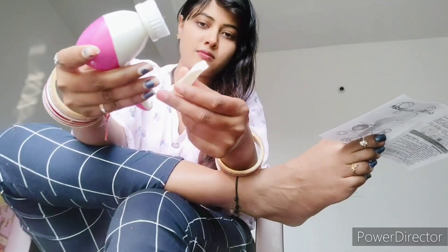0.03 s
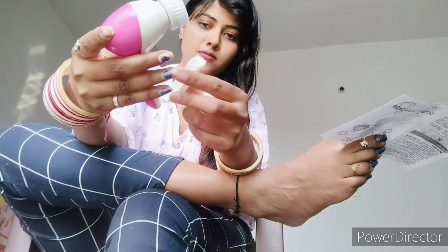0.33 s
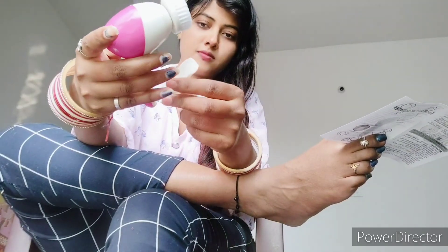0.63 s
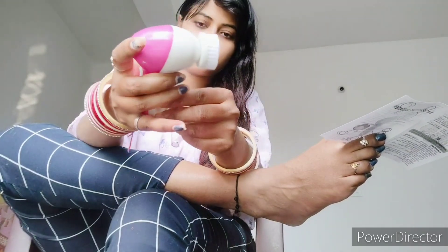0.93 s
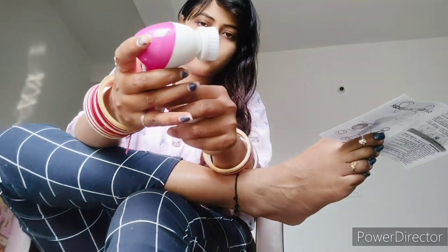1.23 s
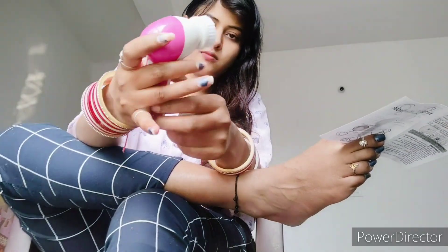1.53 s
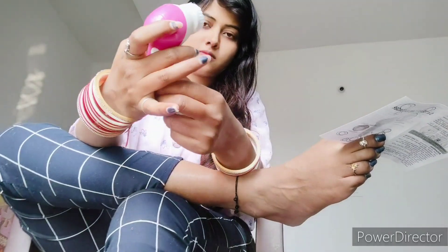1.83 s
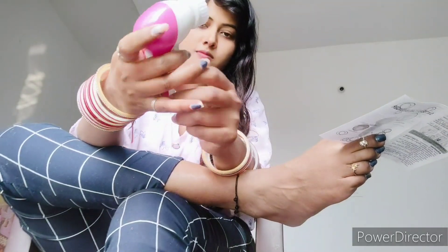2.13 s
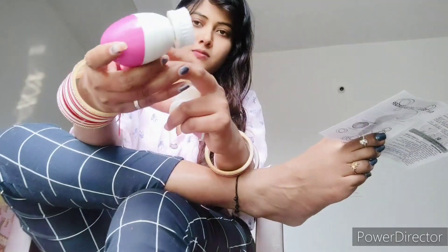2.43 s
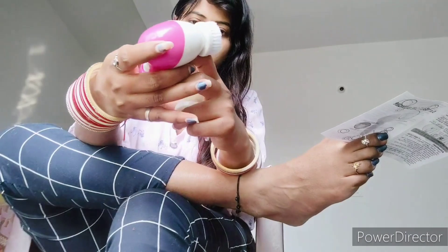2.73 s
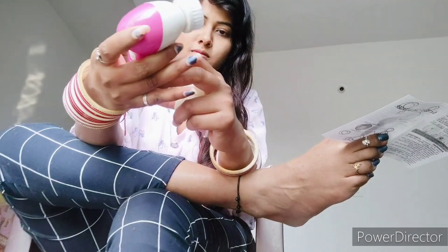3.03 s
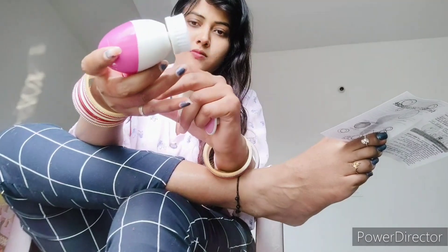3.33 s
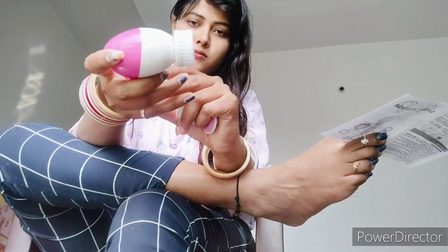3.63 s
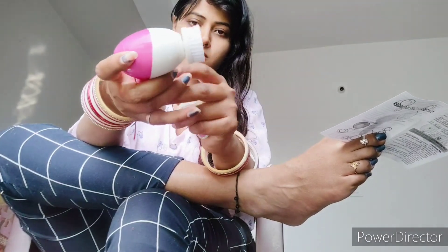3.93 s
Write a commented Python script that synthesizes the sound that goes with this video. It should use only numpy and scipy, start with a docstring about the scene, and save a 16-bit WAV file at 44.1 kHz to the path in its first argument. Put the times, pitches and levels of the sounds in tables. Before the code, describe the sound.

The low, even hum of a small motor carries on indoors over light room noise. A faint hiss rises early and again late, fingers barely brush a plastic bottle, and the hum wavers and fades toward the end.

```python
"""Small motor humming in a room.

A small electric motor hums, steady in pitch. One strong, pure line carries the hum and fades near the end; weak
overtones waver above and below it, narrow low bands beat against it. A soft airy hiss swells twice over the
room noise, with a few faint finger brushes."""
import sys
import numpy as np
from scipy import signal
from scipy.fft import rfft, irfft
from scipy.io import wavfile
from scipy.ndimage import uniform_filter1d

SR = 44100
rng = np.random.default_rng(int(sys.argv[2]) if len(sys.argv) > 2 else 0)


def store_pcm(level_fs):
    """Save levels as 16-bit WAV."""
    pcm = np.round(np.clip(level_fs, -1, 1) * 32767).astype(np.int16)
    wavfile.write(sys.argv[1], SR, np.atleast_2d(pcm).T)


N = 176400
TIME_S = np.arange(N) / SR
FREQ_HZ = np.fft.rfftfreq(N, 1 / SR)

BASE_HZ, HUM_ORDER, RING_ORDER, ROTOR_HZ = 49.5, 3, 8, 49
WAVER_DB, WAVER_RATE_HZ = 2, 3
THROB_HZ, THROB_WANDER_HZ, THROB_WAVER_DB = 128, 1.5, 0.5
WHINE_PEAK_S, WHINE_SIGMA_S = 3.87, 0.14
ROOM_DB, CUTOFF_HZ = -46, 15500

# Room noise spectrum: freq_hz, relative_db
ROOM_SPECTRUM = [(20, -24.5), (45, -19.5), (70, -14), (110, -4), (190, -1.5), (290, -5), (320, -8.5),
                 (460, -7), (530, -12), (660, -12.5), (830, -17.5), (1100, -17), (1600, -21.5),
                 (2200, -25.5), (2850, -29.5), (3400, -37.5), (4300, -38), (5200, -43.5), (9000, -46.5),
                 (15400, -49)]
# Hiss spectrum: freq_hz, relative_db
HISS_SPECTRUM = [(500, -19), (880, -11), (1150, 1.5), (1650, 2), (2300, -1.5), (2600, -4.5), (2900, -4.5),
                 (3300, -14.5), (4200, -27), (6000, -34), (12000, -55.5)]
# Hiss envelope: time_s, level_db
HISS_ENVELOPE = [(0, -51.5), (.2, -55), (.48, -58.5), (.7, -52.5), (.87, -52.5), (1, -55), (1.15, -50.5),
                 (1.38, -57), (1.55, -67.5), (2.65, -62.5), (2.85, -56.5), (3.03, -49.5), (3.35, -52),
                 (3.6, -51), (3.75, -53.5), (4, -62)]
# Brief flares in the hiss: peak_s, sigma_s, centre_hz, width_hz, level_db
HISS_FLARES = [(0.703, .12, 440, 120, -53.5), (.76, .1, 2090, 900, -58), (3.342, .04, 2800, 300, -58),
               (3.459, 0.067, 1050, 500, -51.5), (3.58, 0.053, 1450, 700, -53)]
# Finger brushes: peak_s, sigma_s, level_db
BRUSH_STROKES = [(0.702, .06, -77), (3.23, 0.04, -78), (3.702, .035, -78)]
# Brush spectrum: freq_hz, relative_db
BRUSH_SPECTRUM = [(1500, -14.5), (4000, -0.5), (5500, -3), (7200, -2), (9000, -10), (15000, -26.5)]
# Whine bands: centre_hz, width_hz, level_db
WHINE_BANDS = [(445, 79, -56), (602, 66, -57), (1120, 93, -64.5), (1555, 60, -62.5), (1682, 68, -60),
               (1739, 62, -60), (4030, 700, -78.5), (5500, 700, -80.5)]
# Air-stirred resonances: centre_hz, width_hz, level_db
AIR_MODES = [(92.6, 8.6, -49), (213, 45, -55.5), (267.4, 66, -53), (340, 41, -60), (444, 62, -58.5)]
# Hum sidebands: centre_hz, width_hz, level_re_hum_db
HUM_SIDEBANDS = [(128, 14, -23.5), (163, 19, -23), (111, 14, -34.5)]
# Throb envelope: time_s, level_db
THROB_ENVELOPE = [(0, -36), (.2, -36.5), (.45, -49.5), (.9, -43.5), (2.35, -39.5), (3.1, -41), (3.4, -45.5),
                  (3.51, -33), (3.59, -30), (3.7, -51), (4, -56)]
# Thin electrical tones: pitch_hz, level_db
ELECTRICAL_TONES = [(3752, -89.5), (4048, -88.5), (7650, -92), (7951, -96.5), (11553, -93), (11849, -100)]
# Rotor envelope: time_s, level_db
ROTOR_ENVELOPE = [(0, -36), (.2, -60), (.75, -44), (1.25, -47.5), (1.75, -46.5), (2.2, -50.5), (2.7, -49.5),
                  (3.3, -61), (3.7, -55.5), (4, -58)]
# Weak motor overtones: multiple_of_base, level_db
WEAK_OVERTONES = [(2, -53.5), (4, -59), (5, -53.5), (7, -62), (9, -64), (11, -68), (12, -64), (13, -66),
                  (15, -70), (22, -69)]
# Strongest overtone's envelope: time_s, level_db
RING_ENVELOPE = [(0, -55.5), (.35, -56.5), (.85, -53.5), (1.8, -48), (2.5, -51.5), (2.9, -57), (3.12, -67),
                 (3.4, -52.5), (4, -50)]
# Main hum line's envelope: time_s, level_db
HUM_ENVELOPE = [(0, -19), (.4, -20), (.6, -19), (.73, -17), (.83, -18.5), (1.45, -18), (1.95, -19.5),
                (2.25, -19.2), (2.45, -20.5), (2.7, -20.7), (3.14, -23.5), (3.22, -26), (3.38, -25),
                (3.47, -29), (3.63, -24.5), (3.73, -33), (3.85, -29), (3.92, -36), (4, -33)]


def gain(db):
    """Decibels to amplitude."""
    return 10 ** (np.asarray(db) / 20)


def unit_rms(x):
    """Scale to rms 1."""
    return x / np.sqrt(np.mean(x ** 2) + 1e-30)


def envelope(points):
    """Gain curve through (time_s, level_db) points."""
    return gain(np.interp(TIME_S, *np.transpose(points)))


def swell(peak_s, sigma_s):
    """Gaussian rise and fall, peak 1."""
    return np.exp(-((TIME_S - peak_s) / sigma_s) ** 2 / 2)


def drift(rate_hz):
    """Slow zero-mean random motion, rms 1."""
    lowpass = np.exp(-(FREQ_HZ / rate_hz) ** 2) * (FREQ_HZ > 0)
    return unit_rms(irfft(rfft(rng.standard_normal(N)) * lowpass, N))


def tone(pitch_hz):
    """Sine of steady or moving pitch, random phase, rms 1."""
    cycles = np.cumsum(pitch_hz * np.ones(N)) / SR + rng.random()
    return np.sqrt(2) * np.sin(2 * np.pi * cycles)


def resonance(centre_hz, width_hz):
    """Noise through one steep resonance, rms 1."""
    rolloff = (1 + (2 * (FREQ_HZ - centre_hz) / width_hz) ** 2) ** 1.5
    return unit_rms(irfft(rfft(rng.standard_normal(N)) / rolloff, N))


def noise_bands(bands):
    """Sum of independent narrow noise bands."""
    return sum(gain(db) * resonance(centre_hz, width_hz) for centre_hz, width_hz, db in bands)


def shaped_noise(spectrum, patch_db):
    """Coloured noise with drifting time-frequency patches, rms 1."""
    _, _, cells = signal.stft(rng.standard_normal(N), nperseg=1024, noverlap=768)
    patches = uniform_filter1d(rng.standard_normal(cells.shape), size=10, axis=0)
    patches = unit_rms(uniform_filter1d(patches, size=16, axis=1))
    _, patchy = signal.istft(cells * gain(patch_db * patches), nperseg=1024, noverlap=768)
    freq_hz, relative_db = np.transpose(spectrum)
    colour = gain(np.interp(np.log(FREQ_HZ + 1), np.log(freq_hz), relative_db))
    return unit_rms(irfft(rfft(patchy[:N]) * colour, N))


def room():
    """Steady low room noise."""
    return gain(ROOM_DB) * shaped_noise(ROOM_SPECTRUM, patch_db=0.5)


def hiss():
    """Airy hiss that comes, goes and flares."""
    flares = sum(gain(db) * swell(peak_s, sigma_s) * resonance(centre_hz, width_hz)
                 for peak_s, sigma_s, centre_hz, width_hz, db in HISS_FLARES)
    return envelope(HISS_ENVELOPE) * shaped_noise(HISS_SPECTRUM, patch_db=1) + flares


def fingers():
    """Skin brushing lightly on plastic."""
    strokes = sum(gain(db) * swell(peak_s, sigma_s) for peak_s, sigma_s, db in BRUSH_STROKES)
    return strokes * shaped_noise(BRUSH_SPECTRUM, patch_db=1)


def whine():
    """Faint whine swelling near the end."""
    return swell(WHINE_PEAK_S, WHINE_SIGMA_S) * noise_bands(WHINE_BANDS)


def drone():
    """Fluttering sidebands that follow the hum's level; low resonances stirred by moving air."""
    sidebands = envelope(HUM_ENVELOPE) * noise_bands(HUM_SIDEBANDS)
    return sidebands + noise_bands(AIR_MODES)


def throb():
    """Unsteady tone just under the hum, beating against it."""
    waver = gain(THROB_WAVER_DB * drift(WAVER_RATE_HZ))
    pitch_hz = THROB_HZ + THROB_WANDER_HZ * drift(WAVER_RATE_HZ)
    return envelope(THROB_ENVELOPE) * waver * tone(pitch_hz)


def motor():
    """Hum and overtones on multiples of the base, a slightly slower rotor, thin electrical tones."""
    hum = envelope(HUM_ENVELOPE) * tone(HUM_ORDER * BASE_HZ)
    ring = envelope(RING_ENVELOPE) * tone(RING_ORDER * BASE_HZ)
    overtones = sum(gain(db + WAVER_DB * drift(WAVER_RATE_HZ)) * tone(order * BASE_HZ)
                    for order, db in WEAK_OVERTONES)
    rotor = envelope(ROTOR_ENVELOPE) * tone(ROTOR_HZ)
    electrical = sum(gain(db) * tone(pitch_hz) for pitch_hz, db in ELECTRICAL_TONES)
    return hum + ring + overtones + rotor + electrical


def scene():
    """Mono mix of all sources."""
    motor_sound = motor() + throb() + drone() + whine()
    return (motor_sound + hiss() + room() + fingers())[None]


def record(dry):
    """Linear-phase low-pass band limit."""
    lowpass = signal.firwin(511, CUTOFF_HZ, window=("kaiser", 9), fs=SR)
    return signal.oaconvolve(dry, lowpass[None], "same")


dry = scene()
out = record(dry)
store_pcm(out)
```